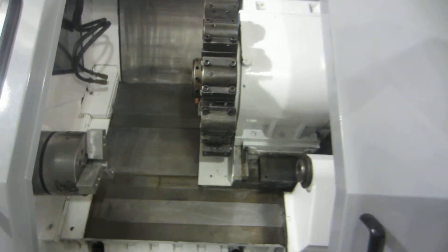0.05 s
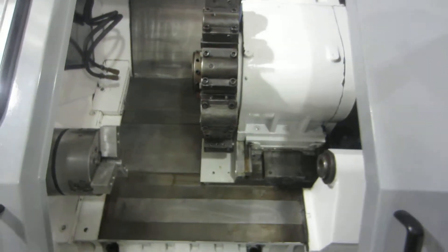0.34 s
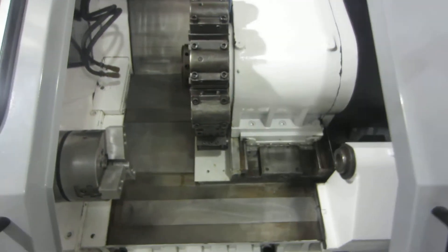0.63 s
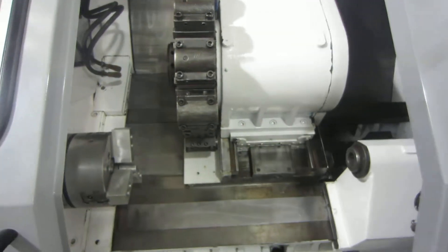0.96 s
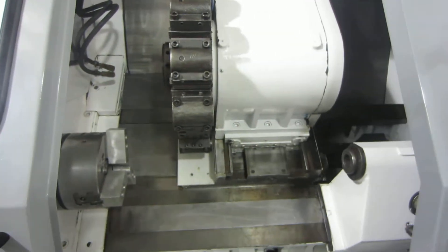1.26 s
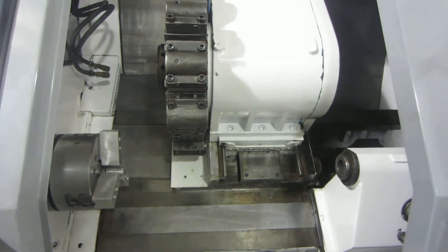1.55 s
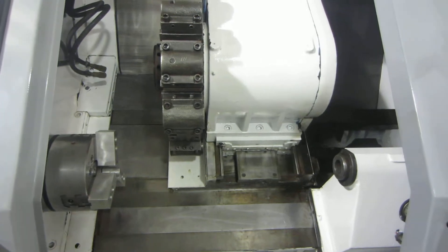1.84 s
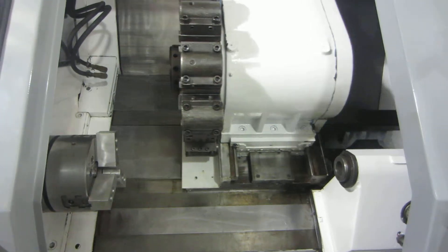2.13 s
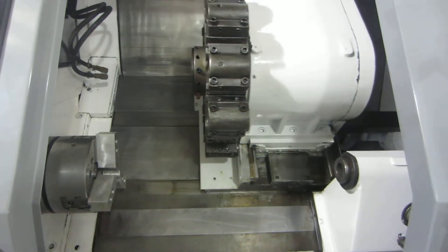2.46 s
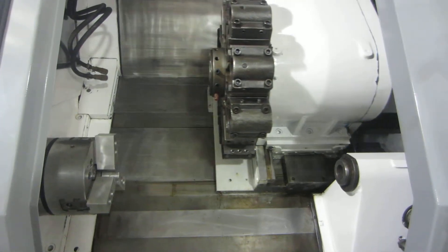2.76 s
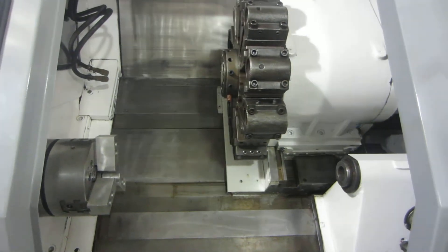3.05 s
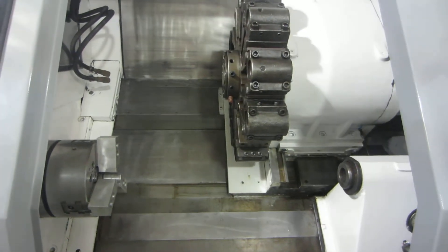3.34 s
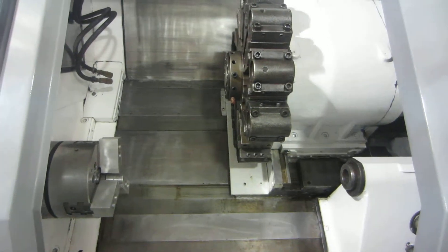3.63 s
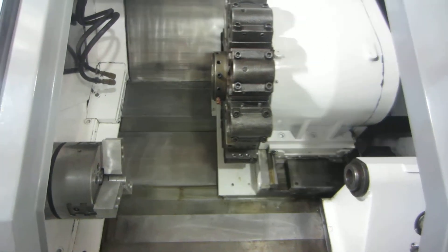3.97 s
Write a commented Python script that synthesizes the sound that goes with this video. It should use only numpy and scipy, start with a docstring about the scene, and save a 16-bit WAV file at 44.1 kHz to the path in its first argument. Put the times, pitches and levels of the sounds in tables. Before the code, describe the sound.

Inside a metal-cutting lathe, louder on the left, a rising motor whine ends in a clunk over steady pump and fan hum. The turret unlocks with a clank, turns and seats, before another clunk and whine.

```python
"""Inside the sheet-metal cabinet of a CNC lathe, over the hum of its pump and fans.
The slide runs with a rising servo whine and stops with a clunk; the turret unlocks, turns for a second
and seats; then the slide starts again. Whines and knocks ring the panels, jolts thump the frame,
valves hiss faintly. The machine is louder on the left."""
import sys
import numpy as np
from scipy import signal
from scipy.fft import rfft, irfft, dct
from scipy.io import wavfile

SR = 44100
rng = np.random.default_rng(int(sys.argv[2]) if len(sys.argv) > 2 else 0)


def put_to_file(sound):
    """Save the sound as 16-bit audio at rate SR, in the file named by the first command-line argument."""
    columns = np.atleast_2d(sound).T  # one column per channel
    safe = np.clip(columns, -1, 1)
    whole_steps = np.round(safe * 32767)
    wavfile.write(sys.argv[1], SR, whole_steps.astype(np.int16))


N = 176400
T, HZ = np.arange(N) / SR, np.fft.rfftfreq(N, 1 / SR)

# cabinet panel resonances: f/Hz, width/Hz, lift/dB
PANELS = [(245, 22, 3), (516, 22, 5), (625.6, 18, 5.5), (810, 17, 4.5), (1450, 13, 4.5), (1886, 12, 8.5),
          (2078, 11, 8), (2270, 10, 7.5), (3220, 33, 6.5)]


def amp(db):
    """dB to gain."""
    return 10 ** (np.asarray(db) / 20)


def curve(points):
    """Table interpolated over log frequency."""
    hz, value = np.transpose(points)
    return np.interp(np.log(HZ + 1), np.log(hz + 1), value)


def noise(density_db):
    """Two independent noises of this spectral density."""
    return irfft(rfft(rng.standard_normal((2, N))) * amp(density_db) * np.sqrt(SR / 2), N)


def drift(rate_hz):
    """Low-passed noise, unit variance."""
    x = irfft(rfft(rng.standard_normal(N)) * np.exp(-(HZ / rate_hz) ** 2), N)
    return x / x.std()


def rough_tone(hz, width_hz, rough):
    """Quadrature pair of tones with narrowband noise, unit power."""
    phase = 2 * np.pi * (np.cumsum(hz * np.ones(N)) / SR + rng.random())
    cos, sin = np.cos(phase), np.sin(phase)
    i, q = 1 + rough * drift(width_hz), rough * drift(width_hz)
    return np.array([i * cos - q * sin, i * sin + q * cos]) / np.sqrt(.5 + rough ** 2)


def gate(start_s, stop_s, rise_s, release_s):
    """Linear rise, hold, exponential release."""
    return np.clip((T - start_s) / rise_s, 0, 1) * np.exp(-np.maximum(T - stop_s, 0) / release_s)


def strike(start_s, rise_s, t60_s):
    """Quick rise, free decay."""
    age_s = np.maximum(T - start_s, 0)
    return np.minimum(age_s / rise_s, 1) * amp(-60 * age_s / t60_s)


def glide(points, width_hz, rough):
    """Rough tone along a pitch and level track."""
    t_s, hz, db = np.transpose(points)
    envelope = amp(np.interp(T, t_s, db)) * gate(t_s[0], t_s[-1], rise_s=.018, release_s=.027)
    return envelope * rough_tone(np.interp(T, t_s, hz), width_hz, rough)


def filtered(x, gain):
    """Zero-phase filter; gain given over HZ."""
    spectrum = dct(x, norm="ortho") * np.interp(np.arange(N) * SR / (2 * N), HZ, gain)
    return dct(spectrum, type=3, norm="ortho")


def panels_db():
    """Spectral lift by the cabinet panels."""
    return sum(db / (1 + (2 * (HZ - hz) / width_hz) ** 2) for hz, width_hz, db in PANELS)


def ring_panels(x, drive=1.2):
    """A tone sweeping past a panel resonance leaves it ringing."""
    return x + drive * sum((amp(db) - 1) * signal.lfilter(*signal.iirpeak(hz, hz / width_hz, fs=SR), x)
                           for hz, width_hz, db in PANELS)


def ripple_db(depth_db=3.5, spacing_hz=26, full_above_hz=1500):
    """Many small high resonances of steel, as random spectral ripple."""
    ripple = np.interp(HZ, np.arange(2000) * spacing_hz, rng.standard_normal(2000))
    return depth_db * ripple * np.minimum(HZ / full_above_hz, 1) ** 2


def hum():
    """Pump and fan tones, wavering in pitch."""
    # f/Hz, level/dB
    tones = [(119, -34), (177.6, -32), (243, -38.5), (317.6, -38), (387.6, -39.5), (613.7, -42),
             (651, -44.5), (775.2, -41.5), (1157, -46.5)]
    out = np.zeros((2, N))
    for hz, db in tones:
        waver = .009 * drift(rate_hz=5.67) * np.sqrt(tones[0][0] / hz)
        out += amp(db) * rough_tone(hz * (1 + waver), width_hz=8.4, rough=.54)
    return out


def rush(swell_db=.5):
    """Steady pump and fan noise, lightly coloured by the cabinet."""
    # f/Hz, density/dB
    spectrum = [(20, -81), (50, -62), (90, -63.5), (130, -56), (200, -53), (320, -52), (450, -58),
                (620, -56.5), (1000, -62.5), (1250, -66.5), (1550, -74.5), (2000, -80.5), (3300, -92.5),
                (5000, -98.3), (10500, -108), (15500, -111)]
    return noise(curve(spectrum) + .5 * (panels_db() + ripple_db())) * amp(swell_db * drift(rate_hz=12))


def frame():
    """Jolts thump the frame; a low rumble comes and goes."""
    # t/s, f/Hz, level/dB, T60/s
    jolts = [(.052, 88.5, -22.5, .35), (0.974, 151.3, -13.5, 0.36), (1.938, 154, -13.5, 0.29),
             (2.004, 150, -15.5, 0.22), (2.046, 153, -19.5, .16), (2.987, 312, -15, .17),
             (3.684, 92, -20, 0.32), (3.722, 175.5, -18, 0.2)]
    # rumble: f/Hz, density/dB
    spectrum = [(35, -82.5), (65, -58.5), (100, -48.5), (150, -52), (400, -110)]
    # rumble: t/s, level/dB
    swell = [(.35, -8), (.8, -1), (1.15, -8), (1.6, 0), (2.25, -.5), (2.6, -17)]
    thumps = sum(amp(db) * strike(t_s, .0089, t60_s) * rough_tone(hz, width_hz=35, rough=.5)
                 for t_s, hz, db, t60_s in jolts)
    rolloff_db = 40 * np.log10(np.maximum(HZ / spectrum[-1][0], 1))
    return thumps + noise(curve(spectrum) - rolloff_db) * amp(np.interp(T, *np.transpose(swell)))


def valves():
    """Faint valve hisses and ticks: bursts of band noise."""
    # t/s, length/s, centre/Hz, width/oct, density/dB
    bursts = [(.043, 0.073, 11500, .4, -100), (1.272, .085, 11000, 1, -101), (1.9, 0.33, 11500, 0.5, -101),
              (3.608, .006, 5870, 0.22, -84), (3.69, .1, 11500, .4, -96.5)]
    out = np.zeros((2, N))
    for t_s, length_s, hz, width_oct, db in bursts:
        skirt_db = 6 * np.minimum((np.log2((HZ + 1) / hz) / width_oct) ** 2, 10)
        out += gate(t_s, t_s + length_s, rise_s=.003, release_s=.008) * noise(db - skirt_db)
    return out


def rolling(spectrum, flutter_db=.6):
    """Fluttering noise of rolling and meshing, coloured by the panels."""
    return noise(curve(spectrum) + panels_db() + ripple_db()) * amp(flutter_db * drift(rate_hz=70))


def slide(from_hz=410, run_hz=912, creep_hz_per_s=45, screw_hz=1193, climb_hz_per_s=55):
    """The servo strains up to speed and settles to a whine; the ball screw sings above it."""
    # start/s, stop/s, level/dB, rise/s, release/s, spin-up/s
    moves = [(.085, 0.992, 0.5, 0.064, 0.037, .062), (3.725, 4.1, -2.5, 0.051, .035, .043)]
    # screw and ways: f/Hz, density/dB
    spectrum = [(100, -64), (270, -50), (450, -58), (700, -54.5), (930, -52), (1080, -62.5), (1260, -57),
                (1450, -63.5), (2000, -75), (2900, -86), (4500, -93), (6200, -98), (10500, -101),
                (15500, -106)]
    out = np.zeros((2, N))
    for start_s, stop_s, db, rise_s, release_s, spin_up_s in moves:
        age_s = np.maximum(T - start_s, 0)
        hz = run_hz - (run_hz - from_hz) * np.exp(-age_s / spin_up_s) + creep_hz_per_s * age_s
        strain = 3.4 * np.exp(-age_s / .085) * rough_tone(hz, width_hz=42, rough=.7)
        whine = amp(-30) * (rough_tone(hz, width_hz=17, rough=.55) + strain)
        screw = amp(-33) * rough_tone(screw_hz + climb_hz_per_s * age_s, width_hz=23, rough=.7)
        out += amp(db) * gate(start_s, stop_s, rise_s, release_s) * (rolling(spectrum) + screw)
        out += amp(db) * gate(start_s, stop_s, rise_s / 2, release_s) * ring_panels(whine)
    return out


def clunks(contacts, modes, rise_s=.005, crunch_db=1.8):
    """Each contact knocks the cabinet, clanks with a crunch of small impacts and rings the steel."""
    # contact spectra: f/Hz, density/dB
    knock_spectrum = [(100, -50), (300, -47), (620, -41.5), (1000, -50), (1300, -51), (1700, -72.5),
                      (3000, -91), (15000, -120)]
    clank_spectrum = [(500, -71), (1400, -57), (2100, -60.5), (2900, -68), (4200, -73.5), (5500, -81.5),
                      (7000, -89), (15500, -102)]
    tick_spectrum = [(1500, -91), (4200, -80), (7000, -88), (10500, -84.5), (15500, -90.5)]
    times_s, knock_db, clank_db, ring_db = np.transpose(contacts)

    def envelope(levels_db, t60_s):
        """Power sum of the strikes."""
        return np.sqrt(sum((amp(db) * strike(t_s, rise_s, t60_s)) ** 2
                           for t_s, db in zip(times_s, levels_db)))

    crunch = amp(crunch_db * drift(rate_hz=250))
    crunch /= np.sqrt(np.mean(crunch ** 2))
    knock = envelope(knock_db, t60_s=.19) * noise(curve(knock_spectrum) + panels_db())
    clank = envelope(clank_db, t60_s=.14) * noise(curve(clank_spectrum) + ripple_db())
    tick = envelope(clank_db, t60_s=.05) * noise(curve(tick_spectrum) + ripple_db())
    ring = sum(amp(db) * envelope(ring_db, t60_s) * rough_tone(hz, width_hz=45, rough=.8)
               for hz, db, t60_s in modes)
    return knock + crunch * (clank + tick) + ring


def slide_clunks():
    """The slide takes up play and stops."""
    # t/s, knock/dB, clank/dB, ring/dB
    contacts = [(.09, -3.5, -11, -10), (.117, -1, -7, -7), (.131, -4.5, -9, -7), (.963, -9.5, 0, -6),
                (.976, -7, -8, -10), (3.688, -12, -16, -14), (3.721, -1, -4.5, -3), (3.728, -1, -2, 2),
                (3.743, -2, -1, -2), (3.761, -8, -4, -7)]
    # f/Hz, level/dB, T60/s
    steel_modes = [(1330, -30.5, .25), (1670, -35, .22), (1938, -41, .2), (2085, -33, 0.13),
                   (2406, -41.5, 0.17)]
    return clunks(contacts, steel_modes)


def groans():
    """Resonances glide as the heavy parts travel."""
    # per resonance: t/s, f/Hz, level/dB
    tracks = [
        [(.1, 305, -27.5), (.35, 315.1, -28.5), (.6, 280, -37), (.88, 244.8, -30.5), (1.0, 149.7, -25)],
        [(.68, 780, -40), (.8, 712, -26.5), (.92, 655, -28), (1.01, 605, -26.5), (1.06, 582, -42)],
        [(2.06, 594.4, -31), (2.13, 598, -26), (2.22, 585, -31), (2.42, 575, -23), (2.49, 525, -24.5),
         (2.53, 500, -40)],
        [(2.0, 150, -25), (2.3, 210, -33), (2.6, 265, -31), (2.9, 335, -29), (2.97, 336.3, -19.5),
         (3.02, 314, -23)],
    ]
    return sum(glide(track, width_hz=42, rough=.65) for track in tracks)


def turret_clunks():
    """The turret coupling unlocks and seats."""
    # t/s, knock/dB, clank/dB, ring/dB
    contacts = [(1.936, -3, 0, -0.5), (1.947, -4, -9, -7), (1.965, -1, -15, -15), (2.008, -3, -8.5, -12),
                (2.943, -3.5, -27, -33), (2.965, -7, -28, -33), (2.988, -3.5, -27, -31)]
    # f/Hz, level/dB, T60/s
    coupling_modes = [(1420, -34, .2), (1973, -29.5, 0.16), (2700, -38.5, 0.19), (3165, -36, 0.11),
                      (3990, -40.5, .1), (5400, -49, .15)]
    return clunks(contacts, coupling_modes)


def turret(start_s=2):
    """Gear noise, a swelling disc hiss and a motor whine that falls as the disc brakes."""
    # f/Hz, density/dB
    disc_spectrum = [(3500, -115), (5400, -95), (6300, -92), (7200, -104), (9200, -96), (9900, -103),
                     (10700, -94.5), (12000, -102), (15500, -107)]
    gear_spectrum = [(100, -66), (240, -50.5), (440, -54), (570, -52.5), (720, -52.5), (950, -54.5),
                     (1080, -58.5), (1220, -56.5), (1450, -67.5), (2000, -77), (2900, -86.5), (4500, -95),
                     (10500, -104), (15500, -108)]
    # t/s, f/Hz, level/dB
    motor_track = [(2.07, 899.3, -45), (2.14, 950, -27.5), (2.45, 953, -31), (2.68, 948, -25.5),
                   (2.79, 951, -34.5), (2.94, 941, -32.5), (2.965, 781, -25), (2.995, 611, -27),
                   (3.04, 560, -44)]
    hiss = gate(start_s, stop_s=2.945, rise_s=.58, release_s=.02) * noise(curve(disc_spectrum)
                                                                        + ripple_db())
    gears = gate(start_s, stop_s=3, rise_s=.2, release_s=.02) * rolling(gear_spectrum)
    whine = glide(motor_track, width_hz=13, rough=.29)
    return gears + hiss + ring_panels(whine)


def drone():
    """Low drone after the turret seats."""
    # f/Hz, level/dB
    tones = [(275, -28.5), (316, -32)]
    envelope = gate(start_s=2.975, stop_s=3.65, rise_s=.15, release_s=.25)
    return envelope * sum(amp(db) * rough_tone(hz, width_hz=42, rough=.54) for hz, db in tones)


def scene():
    """All sources in stereo: coherent bass, diffuse treble, louder left."""
    # f/Hz, left-right coherence
    likeness = [(500, .997), (1000, .91), (2000, .68), (4000, .4), (9000, .28), (15000, .2)]
    # f/Hz, left minus right/dB
    balance = [(500, 7.44), (1100, 8.2), (7000, 6.6), (12000, 7.6)]
    hits = slide_clunks() + turret_clunks()
    common, diffuse = hum() + drone() + rush() + slide() + turret() + groans() + hits + frame() + valves()
    coherence, ratio = curve(likeness), amp(curve(balance))
    left = filtered(common, ratio)
    right = filtered(common, coherence) + filtered(diffuse, np.sqrt(1 - coherence ** 2))
    return filtered(np.array([left, right]), 2 / (1 + ratio))


def record(dry):
    """Soft peak ceiling, end fades, microphone treble notch, band limit."""
    ceiling, fade_s, edge_hz = .8, .004, 15800
    notch_hz, notch_width_hz, notch_db = 7810, 970, -14
    limited = dry / (1 + (dry / ceiling) ** 8) ** (1 / 8)
    fades = np.minimum(np.minimum(T, T[::-1]) / fade_s, 1)
    notch = amp(notch_db * np.exp(-((HZ - notch_hz) / notch_width_hz) ** 2))
    lowpass = np.clip((edge_hz - HZ) / 80, 0, 1)
    return filtered(limited * fades, notch * lowpass)


dry = scene()
out = record(dry)
put_to_file(out)
```